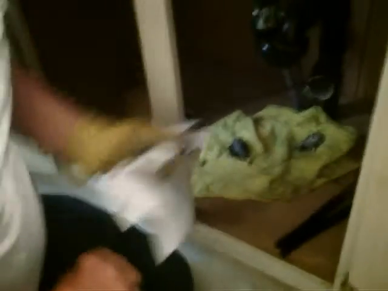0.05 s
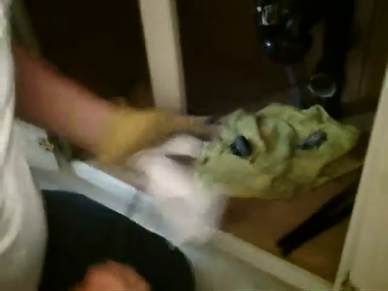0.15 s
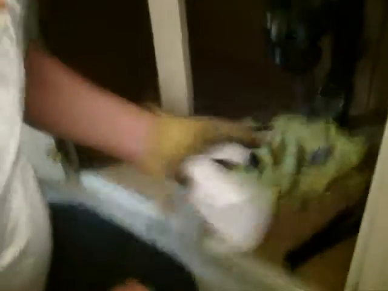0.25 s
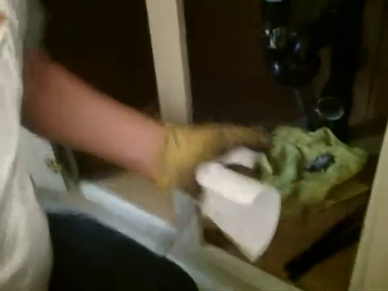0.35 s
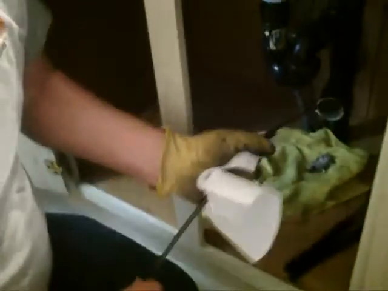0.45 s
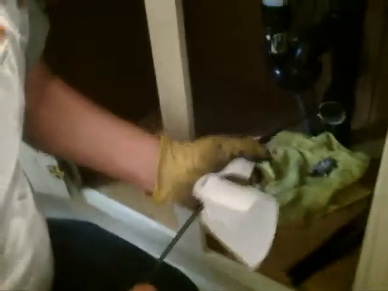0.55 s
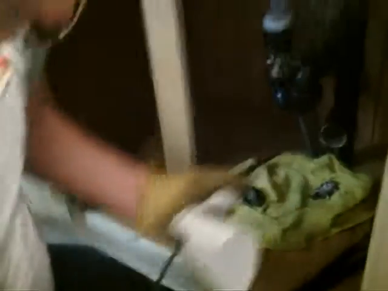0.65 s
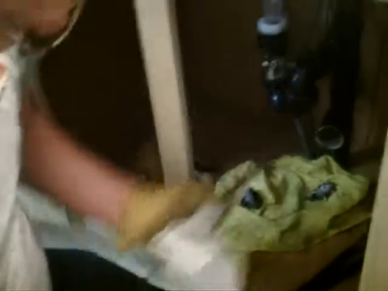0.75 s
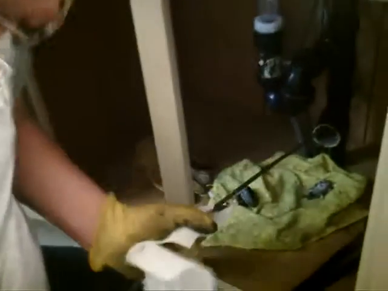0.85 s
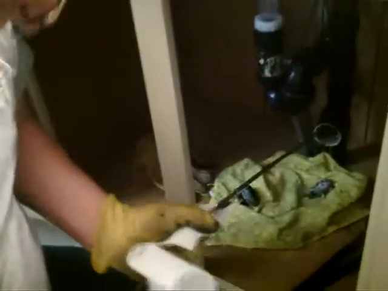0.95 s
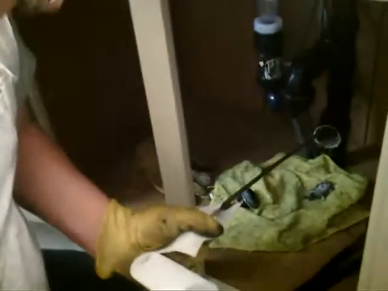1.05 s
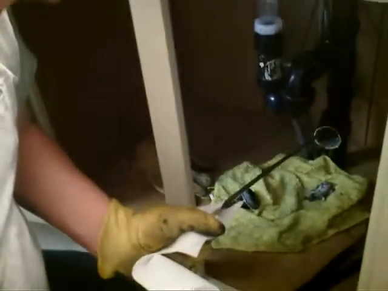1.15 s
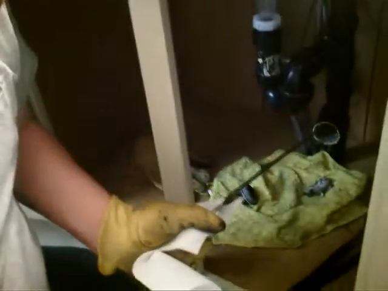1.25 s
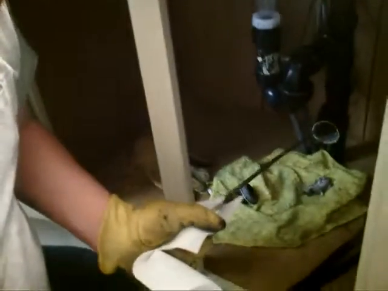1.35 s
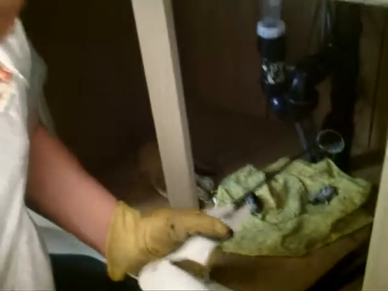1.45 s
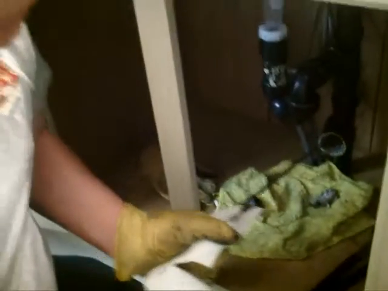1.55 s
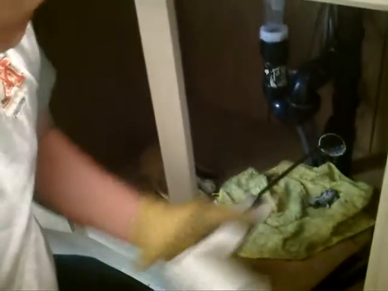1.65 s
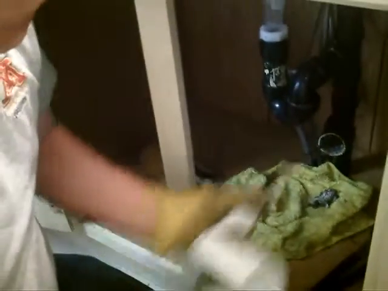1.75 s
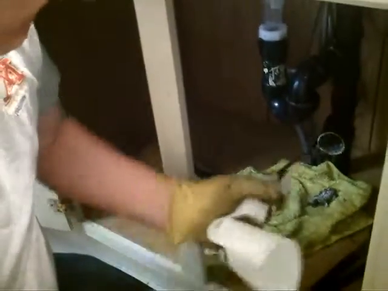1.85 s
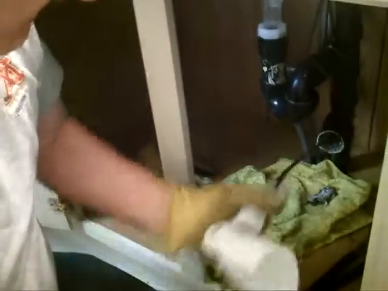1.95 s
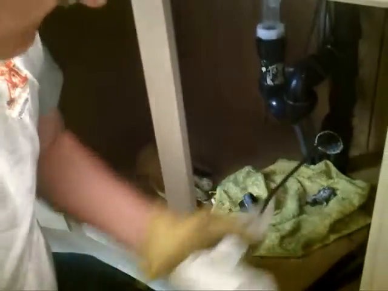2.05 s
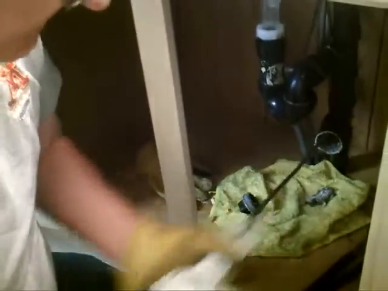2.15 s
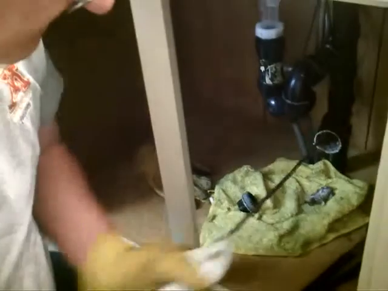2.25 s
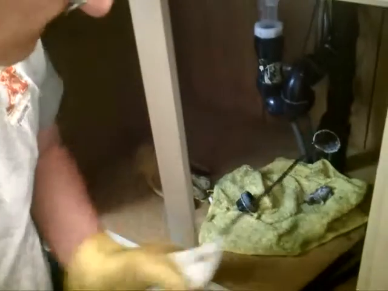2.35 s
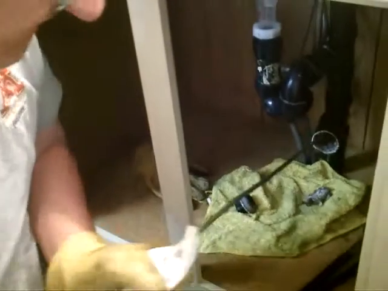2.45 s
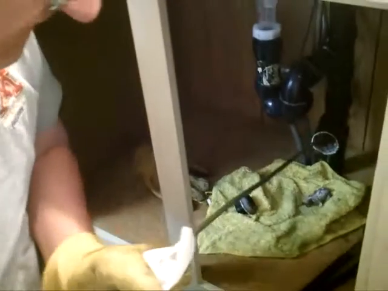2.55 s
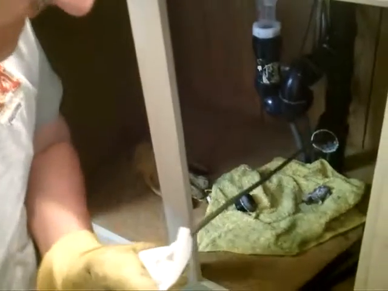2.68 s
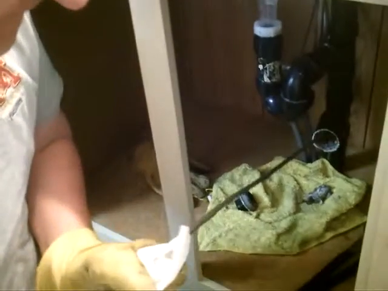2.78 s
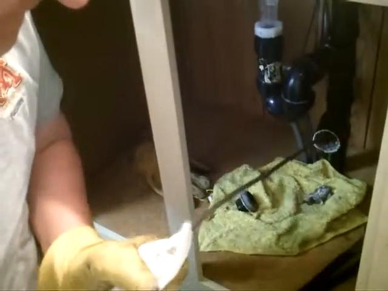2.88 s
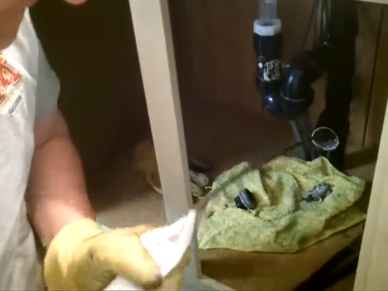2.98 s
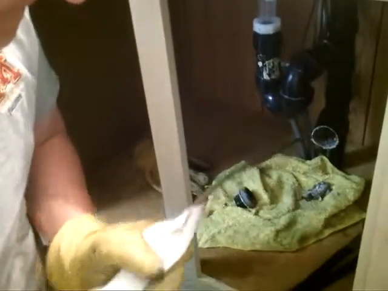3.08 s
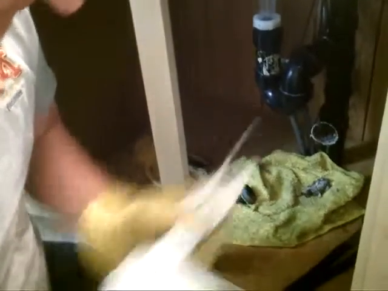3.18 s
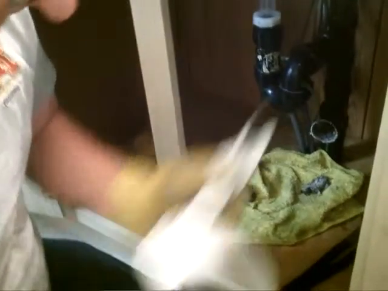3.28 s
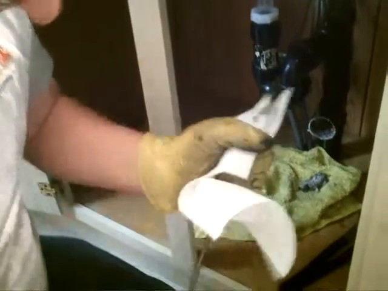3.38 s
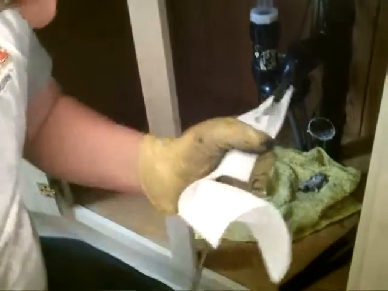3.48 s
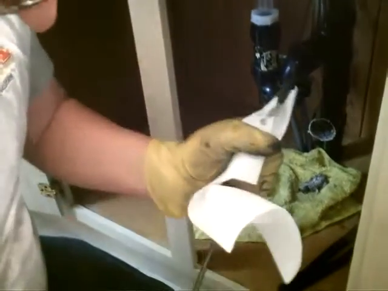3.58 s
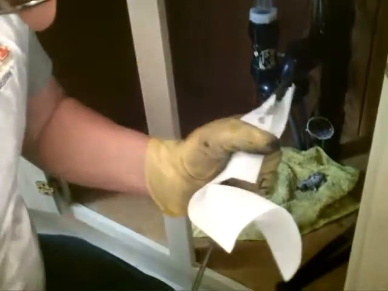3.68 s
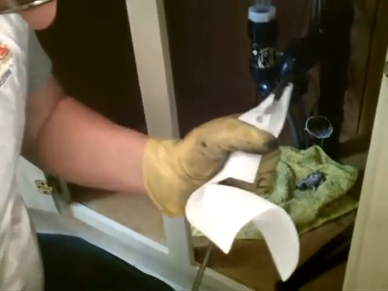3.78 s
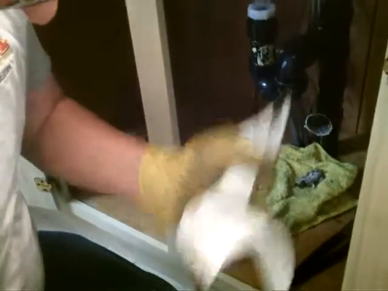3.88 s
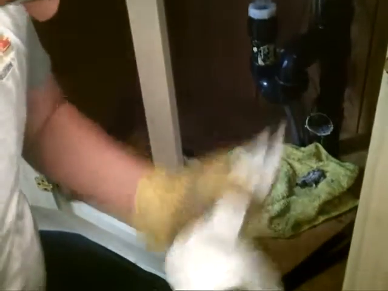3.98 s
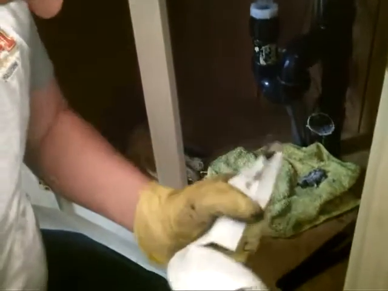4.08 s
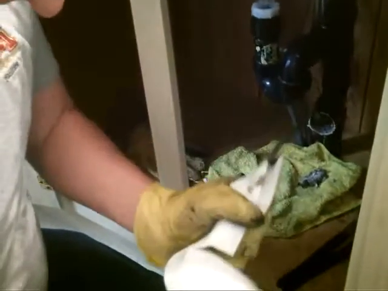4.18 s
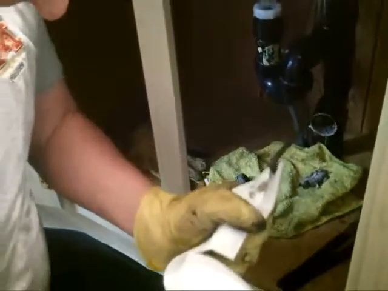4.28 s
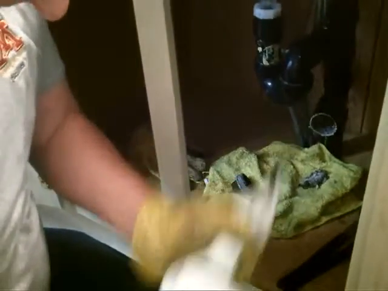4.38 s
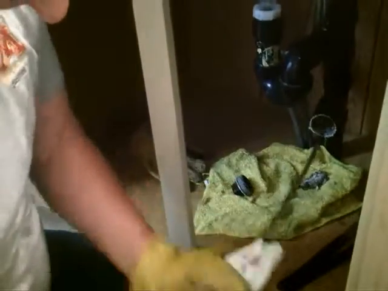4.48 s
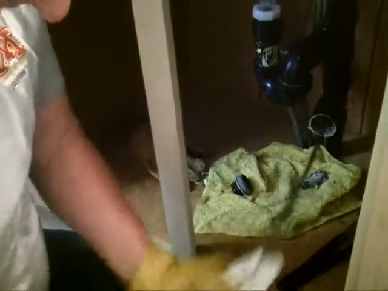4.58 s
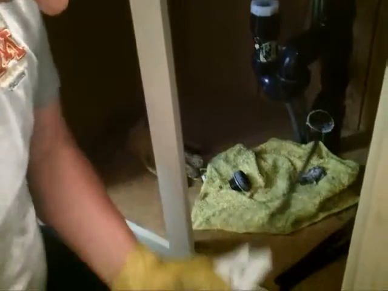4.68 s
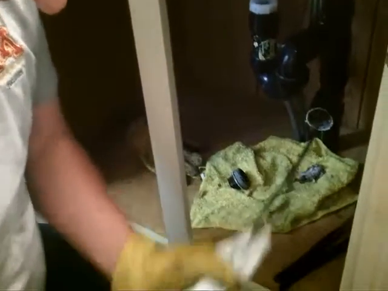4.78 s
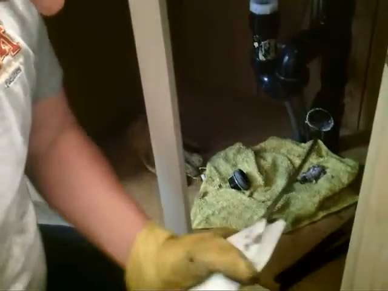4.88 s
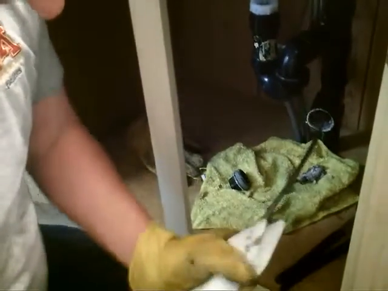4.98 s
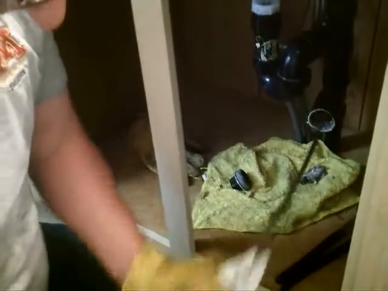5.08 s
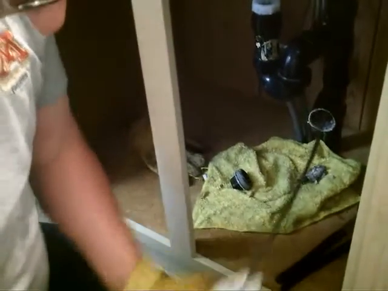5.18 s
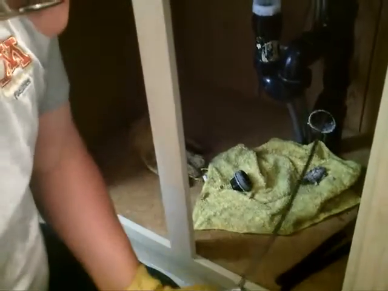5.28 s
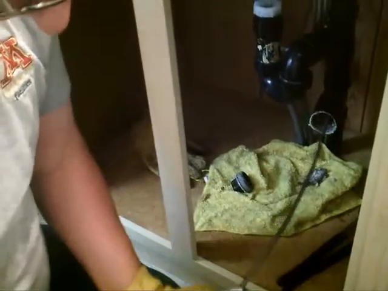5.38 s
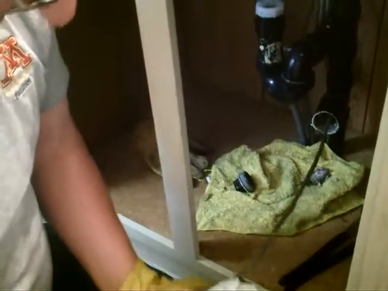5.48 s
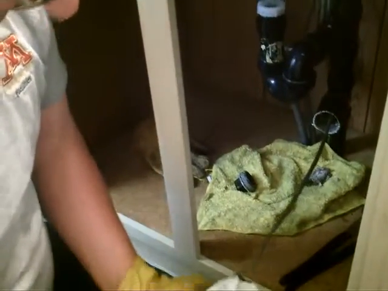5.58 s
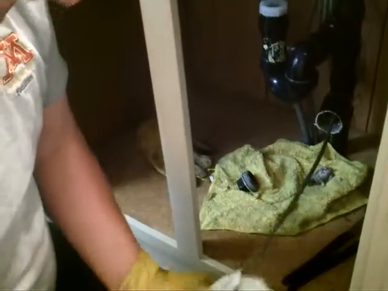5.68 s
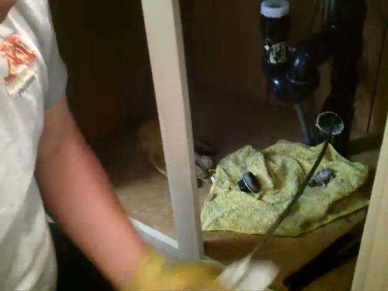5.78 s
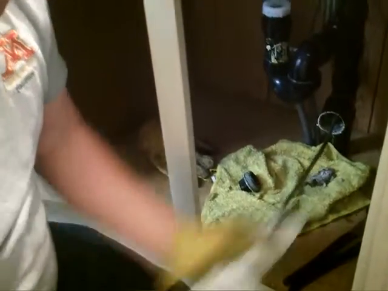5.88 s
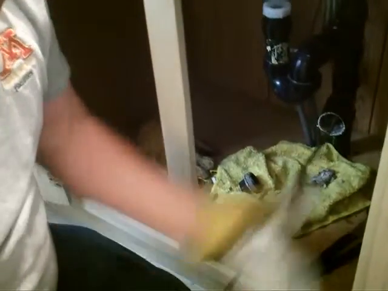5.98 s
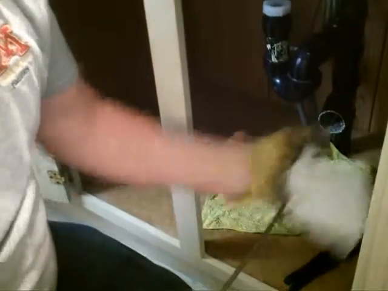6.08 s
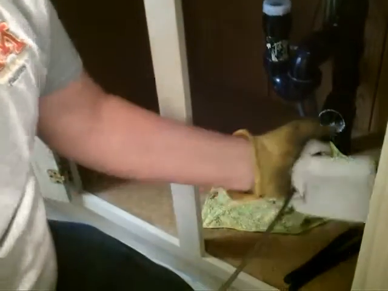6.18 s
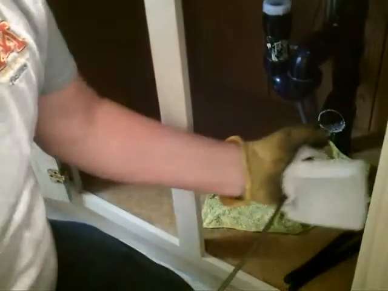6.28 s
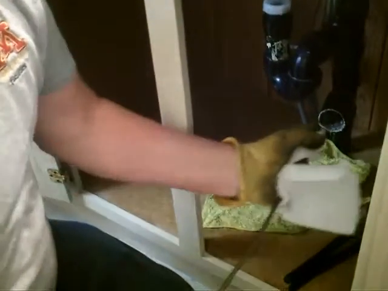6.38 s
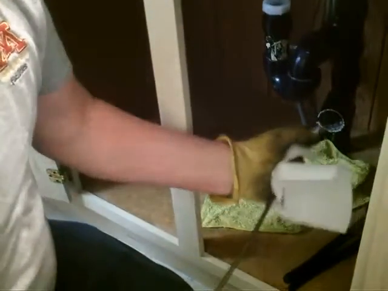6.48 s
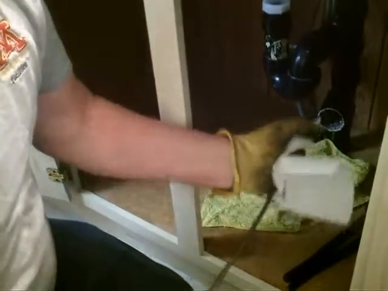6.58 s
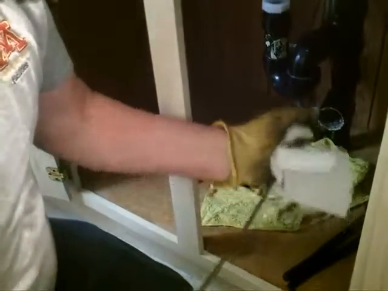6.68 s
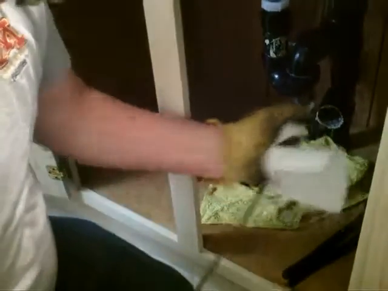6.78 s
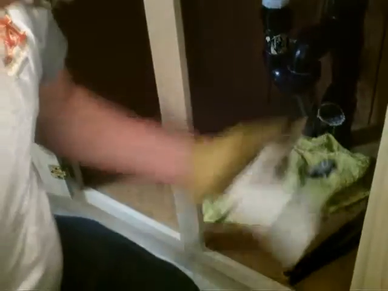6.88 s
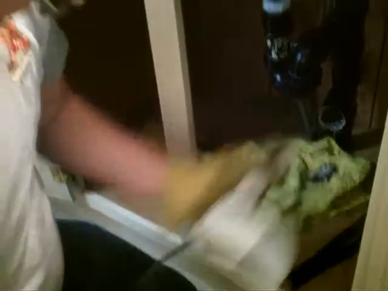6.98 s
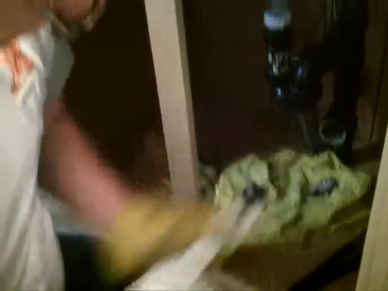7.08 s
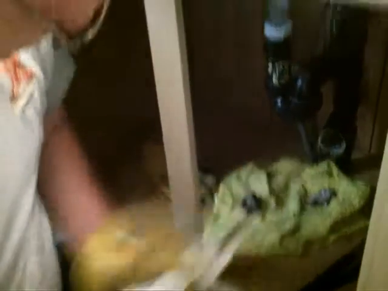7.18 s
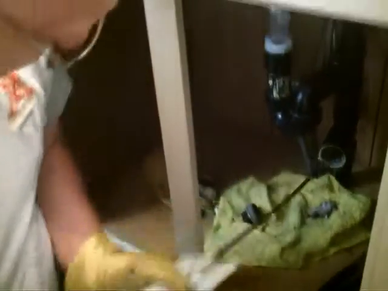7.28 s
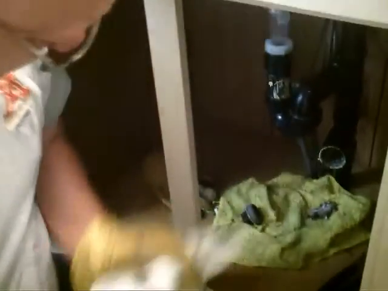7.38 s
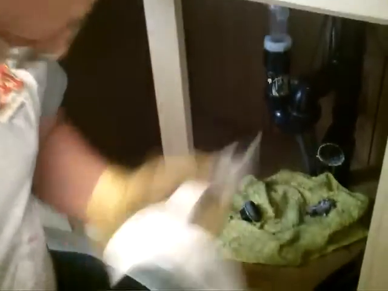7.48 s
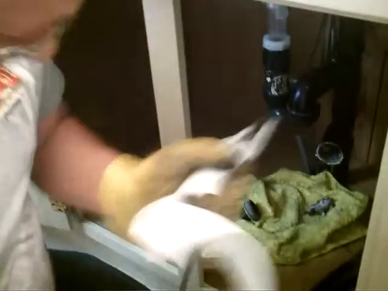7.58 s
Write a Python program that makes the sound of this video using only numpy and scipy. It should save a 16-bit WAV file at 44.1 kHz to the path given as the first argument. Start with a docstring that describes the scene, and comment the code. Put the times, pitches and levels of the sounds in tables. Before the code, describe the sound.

Steady hiss and a thin, very high whine run throughout. A faint scrape and tick open, then a rough rasp at 0.2 s, a hard knock at 0.5 and a strong, duller one at 0.7 with rattling, a rasp and a short buzz until 1.1. A light knock falls at 1.3, a soft scrape at 1.75, a clunk at 1.9. From 2.0 to 2.8 a slow papery wipe rings the bare steel, its buzz falling in pitch. Rasps and sharp clacks return at 3.4-3.6; a lull, then the busiest strokes at 4.0-4.6 and heavy clunks with a long rasp and buzz at 5.0-5.3. Faint rubbing and a small knock follow around 5.6-6.3. Light ticks lead to a brighter wipe at 6.8-7.5, its buzz rising near 7.1, then tiny closing taps. Close, bass-light microphone; short, hard small-room echo.

```python
"""A faint scrape and tick over steady hiss and a thin whine, then rough rasps, hard knocks and short buzzes:
a coiled steel drain cable is hauled out of a plastic pipe under a sink and wiped through a paper rag.
Turns tick over the pipe lip and ring pipe and cabinet; on even pulls they buzz at a pitch set by speed.
Shaped noise makes the rag's hiss, decaying bursts the knocks; a small hard room answers."""
import sys
import numpy as np
from scipy import signal
from scipy.fft import rfft, irfft
from scipy.io import wavfile
from scipy.ndimage import uniform_filter1d

SR = 44100
rng = np.random.default_rng(int(sys.argv[2]) if len(sys.argv) > 2 else 0)


def voltage_ratio(decibels):
    """Convert decibels (scalar or array-like) to amplitude ratios, 20 dB per decade."""
    exponent = np.asarray(decibels, float) / 20
    return 10 ** exponent


def int16_out(signal):
    """Quantize to a 16-bit WAV file."""
    q = np.round(np.clip(np.atleast_2d(signal).T, -1, 1) * 32767)
    wavfile.write(sys.argv[1], SR, q.astype(np.int16))


N = 337360

# resonances of pipe, cable and cabinet, also struck by the knocks: (f/Hz, width/Hz, level/dB)
BODY_MODES = [(208, 69, -9), (280, 79, -16.5), (440, 48, -8), (553, 73, -4), (694, 83, 2.5),
              (790, 110, 4.5), (939, 84, 5), (1019, 97, 4), (1470, 265, 12.5), (1583, 200, 15),
              (1832, 340, 7.5), (2090, 293, 4.5), (2550, 470, 2), (2687, 720, 4.5), (3360, 1040, -2),
              (4460, 1020, -14.5)]


def pipe_scrape(slips, scrape, grip, bare, thump):
    """Turns slipping on the lip drive pipe and cabinet; a heavier grip lengthens contacts, feeding low modes."""
    heavy = dull(dull(slips, 398), 398)
    light = level(slips - heavy, 0)
    gripped = level(signal.lfilter(*signal.butter(2, 370, "high", fs=SR), heavy), 0.48)
    # sliding hardly moves the heavy panels, a shudder does
    panels = thump * level(dull(heavy, 240), 0)
    push = grip * gripped + (1 - grip) * light + panels
    return level(ring(scrape * np.sqrt(1 - bare) * push, BODY_MODES, spread_db=1.5), -30.5)


# resonances of the bare cable: (f/Hz, width/Hz, level/dB)
BARE_CABLE_MODES = [(1040, 120, 1), (1390, 90, -2), (1700, 70, 7), (2050, 60, 2), (2360, 50, 5),
                    (2600, 80, 2.5), (2930, 140, -4), (4060, 80, -5), (4700, 110, -12)]


def bare_cable(slips, scrape, bare):
    """The slips that rub the bare cable excite its own modes."""
    return voltage_ratio(7.0) * ring(scrape * np.sqrt(bare) * slips, BARE_CABLE_MODES, spread_db=3.5)


# spectrum of the rag's hiss: (f/Hz, relative level per Hz/dB)
RAG_SPECTRUM = [(880, -6), (1500, -13), (1740, -9.5), (2610, -10), (3660, -15.5), (4160, -11), (6630, -13),
                (8080, -13), (11300, -14.5), (16000, -22.5)]
# high cable resonances sung under the rag: (f/Hz, width/Hz, level/dB)
RAG_CABLE_MODES = [(4070, 92, 4), (6520, 100, 9.5), (8430, 210, -3.5), (9190, 180, 12.5), (11340, 170, -1)]


def rag_hiss(rag_gain):
    """Paper fibres hiss as noise and random ticks along the steel, setting it singing faintly."""
    fibres = rng.standard_normal(N) + 0.69 * ticks(1500, 5.1)
    fibres = fibres * voltage_ratio(2.42 * walk(40))
    hiss = level(colour(fibres, RAG_SPECTRUM), 1.02)
    singing = level(ring(fibres, RAG_CABLE_MODES, spread_db=-3.5), -8.5)
    return rag_gain * (hiss + singing)


def haul(t):
    """Uneven stick-slip ticks drive pipe and bare cable while the rag hisses."""
    scrape, grip, bare, thump, rag_gain = motions(t)
    slips = ticks(3000, 2.34) * voltage_ratio(2.0 * walk(60))
    pipe = pipe_scrape(slips, scrape, grip, bare, thump)
    return pipe + bare_cable(slips, scrape, bare) + rag_hiss(rag_gain)


# tugs over the pipe lip: catch, swell, hold, die away; grip is duller when high
# (t/s, swell/s, hold/s, relative scrape level/dB, rag level/dB, grip weight/0-1)
TUG_ROWS = [(0.067, 0.017, 0.09, -31.5, -54.5, 0.53), (0.195, 0.058, 0.035, -18, -34, 0.29),
            (0.357, 0.022, 0.061, -55, -54.5, 0.5), (0.464, 0.016, .015, -40, -68, 0.53),
            (0.632, 0.0173, 0.019, -45, -56, 0.8), (0.769, 0.067, 0.011, -22.5, -35.5, 0.46),
            (0.853, 0.026, 0.011, -18, -40.5, 0.32), (1.586, 0.016, 0.077, -43, -63.5, 0.52),
            (1.735, 0.054, 0.059, -26, -41, 0.36), (2.847, 0.011, 0.042, -53.5, -49, 0.4),
            (3.385, 0.051, 0.015, -20.5, -36, 0.27), (3.478, 0.022, 0.0067, -28.5, -41.5, 0.19),
            (3.7, .05, 0.5, -59.5, -82, 0.63), (3.975, 0.066, 0.045, -20.5, -39, 0.23),
            (4.073, 0.028, 0.0069, -14.5, -29.5, 0.31), (4.479, 0.067, 0.045, -14.5, -31, 0.29),
            (4.6, 0.017, 0.012, -21, -35, 0.57), (4.7, 0.012, 0.22, -51, -61, 0.38),
            (4.936, 0.017, 0.049, -43.5, -54.5, 0.45), (5.135, 0.16, 0.021, -16, -32, 0.25),
            (5.314, 0.031, 0.0088, -19, -31.5, 0.31), (5.43, 0.041, 0.16, -51, -62, 0.5),
            (5.727, 0.032, .01, -48.5, -59, 0.38), (6.358, 0.03, 0.45, -59.5, -70, 0.45),
            (6.791, 0.008, 0.035, -38.5, -47, 0.66), (7.441, 0.013, 0.0066, -40.5, -59.5, 0.57),
            (7.509, 0.05, 0.011, -47, -59, 0.52), (7.57, .01, .06, -46.5, -61.5, 0.44)]
# the cable shuddering on in the pipe after a knock:
# (t/s, relative scrape level/dB, fade/dB per s, grip weight/0-1, level passed to panels/dB)
SHUDDER_ROWS = [(0.498, -25.5, 263.5, 0.43, -17), (0.663, -41, 43, 0.53, -9), (0.707, -25, 86.5, 0.63, -16),
                (1.224, -43, 350, 0.62, -7), (1.274, -27, 427.5, 0.59, -2.5), (1.911, -21, 246, 0.95, 3.5),
                (3.56, -41.5, 305, 0.27, -18), (3.586, -26, 232.5, 0.62, -14.5),
                (5.011, -22.5, 239, 0.63, -1), (5.074, -29.5, 94, 0.57, 3.5), (5.56, -39, 131, 0.32, -10),
                (6.28, -47.5, 136, 0.76, -13), (6.762, -39.5, 198, 0.76, -15)]
# slow wipes of the rag along the bare cable, one list each: (t/s, relative scrape level/dB, rag level/dB)
WIPE_PATHS = [
    [(0.73, -35.5, -44.5), (0.79, -25.5, -42.5), (0.93, -34, -42), (1.06, -34, -43), (1.2, -68, -73.5)],
    [(2.0, -56.5, -56.5), (2.16, -41, -41.5), (2.3, -39.5, -38), (2.42, -28.5, -37.5), (2.51, -26.5, -38),
     (2.65, -31, -40.5), (2.84, -74, -58.5)],
    [(5.84, -52, -66), (5.87, -54, -57.5), (6.0, -61.5, -55), (6.26, -55, -51.5), (6.34, -65, -54.5)],
    [(6.76, -58, -50.5), (6.88, -44, -49), (6.96, -29, -37), (7.08, -21.5, -28.5), (7.14, -23.5, -27.5),
     (7.22, -33.5, -35), (7.37, -22.5, -34.5), (7.49, -64, -73)],
]
# one row per wipe: (grip weight/0-1, share rubbing the bare cable/0-1)
WIPE_CONTACT = [(0.55, 0.58), (0.53, 0.82), (0.6, 0.58), (0.4, 0.75)]
CATCH_S = 0.018  # a tug takes hold over this time
SWELL_DB, RAG_SWELL_DB = 17, 17.5
FALL_DB_PER_S, RAG_FALL_DB_PER_S = 366, 375
TUG_BARE_SHARE = 0.091


def motions(t):
    """Powers of all motions add; grip, bare share and panel share are weighted by scrape power."""
    scrape, rag = np.full((2, N), 1e-9)
    grip, bare, thump = np.zeros((3, N))
    for s, swell_s, hold_s, db, rag_db, weight in TUG_ROWS:
        lack = np.clip(1 - (t - s) / swell_s, 0, 1)
        after_s = np.maximum(t - s - swell_s - hold_s, 0)
        catch = np.clip((t - s) / CATCH_S, 0, 1) ** 2
        power = catch * voltage_ratio(db - SWELL_DB * lack - FALL_DB_PER_S * after_s) ** 2
        scrape = scrape + power
        grip = grip + weight * power
        bare = bare + TUG_BARE_SHARE * power
        rag = rag + catch * voltage_ratio(rag_db - RAG_SWELL_DB * lack - RAG_FALL_DB_PER_S * after_s) ** 2
    for s, db, fade_db_per_s, weight, thump_db in SHUDDER_ROWS:
        # fades at its own rate until the next tug or shudder takes the cable, then faster
        held_s = min(row[0] for row in TUG_ROWS + SHUDDER_ROWS if row[0] > s)
        fade_db = fade_db_per_s * np.maximum(t - s, 0)
        fall_db = FALL_DB_PER_S * np.maximum(t - held_s, 0)
        power = (t >= s) * voltage_ratio(db - fade_db - fall_db) ** 2
        scrape = scrape + power
        grip = grip + weight * power
        thump = thump + voltage_ratio(thump_db) ** 2 * power
    for path, (weight, share) in zip(WIPE_PATHS, WIPE_CONTACT):
        s, db, rag_db = np.transpose(path)
        on = (t >= s[0]) & (t < s[-1])
        power = on * voltage_ratio(np.interp(t, s, db)) ** 2
        scrape = scrape + power
        grip = grip + weight * power
        bare = bare + share * power
        rag = rag + on * voltage_ratio(np.interp(t, s, rag_db)) ** 2
    grip, bare = np.clip(grip / scrape, 0, 1), np.clip(bare / scrape, 0, 1)
    return np.sqrt(scrape), grip, bare, np.sqrt(thump / scrape), np.sqrt(rag)


# blows of the cable: (t/s, relative peak level/dB, relative brightness/dB)
KNOCK_ROWS = [(0.083, -37, -14), (0.497, -8.5, -10), (0.664, -35, -22), (0.706, -3, -22.5),
              (0.734, -14.5, -23), (0.841, -10.5, -1), (1.224, -30, -34.5), (1.275, -24, -13.5),
              (1.602, -46.5, 6), (1.908, -24, -25), (1.919, -10, -26), (1.93, -12.5, -7),
              (3.386, -27, -20.5), (3.406, -23, -8.5), (3.455, -7, -6.5), (3.509, -20, -11),
              (3.56, -32, -6.5), (3.587, -17.5, -7.5), (3.769, -43, -22), (3.898, -33, -30),
              (3.98, -26, -10), (3.995, -26, -6), (4.007, -18.5, -7.5), (4.048, -12.5, -7.5),
              (4.11, -8.5, -4), (4.284, -32, -16), (4.487, -36, -8), (4.598, -7, -18), (4.956, -36.5, 1),
              (5.007, -6.5, -16), (5.031, -16, -17), (5.074, -13, -14), (5.099, -26, -22),
              (5.127, -17.5, -9.5), (5.558, -20, -21.5), (5.854, -35, -20), (5.941, -36, -14),
              (6.281, -23.5, -15), (6.563, -37, -10), (6.648, -30.5, -22), (6.762, -22, -22),
              (7.558, -38, -11.5), (7.582, -36, -7)]
RATTLE_S = 0.0041  # decay constant of the bouncing contact


def knocks():
    """Each blow is a few ms of bouncing contact into the same body, with a sharp crack on top."""
    blows, cracks = np.zeros(N), np.zeros(N)
    t = np.arange(int(0.12 * SR)) / SR
    bounces = np.sign(rng.standard_normal((len(KNOCK_ROWS), len(t))))
    envelope = np.minimum(t / 0.00097, 1) * np.exp(-t / RATTLE_S)
    for (s, db, bright_db), bounce in zip(KNOCK_ROWS, bounces):
        i = int(s * SR)
        burst = (voltage_ratio(db) * bounce * envelope)[:N - i]
        blows[i:i + len(burst)] += burst
        cracks[i:i + len(burst)] += voltage_ratio(bright_db) * burst * np.exp(-t / 0.042)[:len(burst)]
    body = voltage_ratio(11.0) * ring(dull(blows, 416), BODY_MODES, spread_db=2.0)
    crack = signal.lfilter(*signal.butter(2, [1200, 4000], "band", fs=SR), cracks)
    return body + voltage_ratio(7) * crack + voltage_ratio(-15.0) * cracks


# even pulls, one list each: (t/s, turn rate f/Hz, relative level/dB)
BUZZ_PULLS = [
    [(0.87, 310, -31), (0.91, 300, -30.5), (0.97, 275, -43), (1.01, 300, -51), (1.06, 309, -32),
     (1.11, 280, -56)],
    [(2.32, 296.2, -46), (2.414, 310.5, -33.5), (2.47, 267, -41.5), (2.52, 268, -31), (2.575, 267.5, -39),
     (2.63, 207, -43), (2.71, 163.6, -54)],
    [(5.02, 255, -30), (5.06, 252, -41), (5.09, 214.3, -32), (5.135, 233, -44), (5.18, 255, -54)],
    [(6.03, 392, -62), (6.07, 420, -54), (6.155, 480, -54), (6.175, 612, -52), (6.25, 640, -62)],
    [(6.93, 198, -50), (6.955, 210, -42), (6.992, 254, -35), (7.038, 286, -33), (7.074, 332, -30),
     (7.108, 353, -33), (7.16, 357, -31), (7.2, 360, -47)],
]
# one row per pull: (first, second, third, higher partials; relative level/dB)
PARTIAL_LEVELS = [(-14, -3, -12, -14), (-8, 0, -12, -9), (1, -2, -9, -13), (0, -5, -7, -9),
                  (-8, -1, -1, -3)]
UPPER_HZ = 2860  # higher partials fade past this pitch


def buzz(t):
    """Turns passing at an even rate: a harmonic stack; uneven spacing blurs the upper partials most."""
    out = np.zeros(N)
    for pull, (*low_db, upper_db) in zip(BUZZ_PULLS, PARTIAL_LEVELS):
        s, hz, db = np.transpose(pull)
        hz, db = np.interp(t, s, hz), np.interp(t, s, db)
        phase = 2 * np.pi * np.cumsum(hz * (1 + 0.009 * walk(120))) / SR
        fade = np.clip(np.minimum(t - s[0], s[-1] - t) / 0.012, 0, 1)
        stack = np.zeros(N)
        for k, rel_db in enumerate(low_db, 1):
            stack += voltage_ratio(rel_db + 2.5 * walk(60)) * np.sin(k * phase)
        for k in range(4, 13):
            rolloff = 1 + (k * hz / UPPER_HZ) ** 4
            stack += voltage_ratio(upper_db + 3.0 * walk(40)) * np.sin(k * phase) / rolloff
        out += np.sqrt(2) * fade * voltage_ratio(db) * stack
    return out


ROOM_T60_S, ROOM_DB, ROOM_DULL_HZ = 0.23, -11, 2380


def room(x):
    """A dense noise tail of the cabinet and tiled walls, its treble dying five times sooner."""
    t = np.arange(int(0.5 * SR)) / SR
    noise = rng.standard_normal(len(t)) * np.minimum(t / 0.00049, 1)
    low = dull(noise, ROOM_DULL_HZ)
    low_tail = low * voltage_ratio(-60 * t / ROOM_T60_S)
    high_tail = (noise - low) * voltage_ratio(-60 * t / (0.2 * ROOM_T60_S))
    tail = low_tail + high_tail
    return signal.fftconvolve(x, voltage_ratio(ROOM_DB) * tail / np.sqrt(np.sum(tail ** 2)))[:N]


# spectrum of the background hiss: (f/Hz, relative level per Hz/dB)
HISS_SPECTRUM = [(18, -64), (30, -13), (75, -17), (103, -12.5), (141, -17), (449, -7), (702, -4),
                 (3670, -10), (4530, -11), (5310, -11), (7470, -13), (14800, -13), (16000, -25)]
HISS_RMS_DB = -58.5
# steady high tone: (f/Hz, level/dB)
WHINE_TONES = [(15735, -70)]


def room_tone(t):
    """Steady hiss of room and electronics as shaped noise, with a thin high sine swaying slightly in level."""
    out = level(colour(rng.standard_normal(N), HISS_SPECTRUM), HISS_RMS_DB)
    for hz, db in WHINE_TONES:
        out = out + np.sqrt(2) * voltage_ratio(db + 1.6 * walk(6)) * np.sin(2 * np.pi * hz * t)
    return out


def level(x, db):
    """Scale to an rms level."""
    return x * voltage_ratio(db) / np.sqrt(np.mean(x ** 2))


def ring(x, modes, spread_db=0):
    """Sum of two-pole resonances, alternately signed, each with its own slow sway in strength."""
    out = 0
    for k, (hz, width_hz, db) in enumerate(modes):
        b, a = signal.iirpeak(hz, hz / width_hz, fs=SR)
        gain = (-1) ** k * voltage_ratio(db + spread_db * walk(12))
        out = out + gain * signal.lfilter(b, a, x)
    return out


def colour(x, points):
    """Shape a signal with a spectrum of (Hz, dB) points, interpolated over log frequency."""
    hz, db = np.transpose(points)
    f = np.maximum(np.fft.rfftfreq(len(x), 1 / SR), 1)
    return irfft(rfft(x) * voltage_ratio(np.interp(np.log(f), np.log(hz), db)), len(x))


def walk(rate_hz):
    """Random levels held 1 / rate_hz s and slewed twice; spread near 1."""
    k = int(SR / rate_hz)
    steps = np.repeat(rng.standard_normal(N // k + 1), k)
    return 1.36 * uniform_filter1d(uniform_filter1d(steps, k), k)[:N]


def ticks(rate_hz, spread_db):
    """Random clicks of either sign, some bigger than the rest; rms 1."""
    chance = rng.random((3, N))
    size = voltage_ratio(np.minimum(-spread_db * np.log(1 - chance[1]), 11)) * np.sign(chance[2] - 0.5)
    return level(size * (chance[0] < rate_hz / SR), 0)


def dull(x, hz):
    """One-pole low-pass."""
    return signal.lfilter(*signal.butter(1, hz, fs=SR), x)


LOW_CUT_HZ = 317


def scene():
    """The work close by with its room; the small microphone loses the bass; both channels carry the same."""
    t = np.arange(N) / SR
    work = haul(t) + knocks() + buzz(t)
    low_cut = signal.butter(3, LOW_CUT_HZ, "high", fs=SR, output="sos")
    heard = signal.sosfilt(low_cut, work + room(work))
    return np.tile(heard + room_tone(t), (2, 1))


def band_limit(x):
    """A steep low-pass at the top of the band."""
    return signal.sosfilt(signal.butter(12, 16480, fs=SR, output="sos"), x)


def record(dry):
    """A slightly lopsided input stage adds a squared term: a faint rumble under loud strokes."""
    lopsided = dry + 0.06 * dry ** 2
    return band_limit(lopsided)


dry = scene()
out = record(dry)
int16_out(out)
```